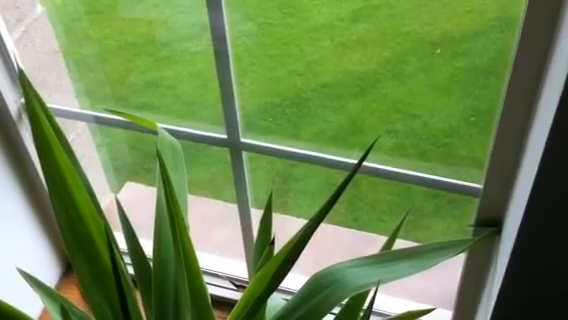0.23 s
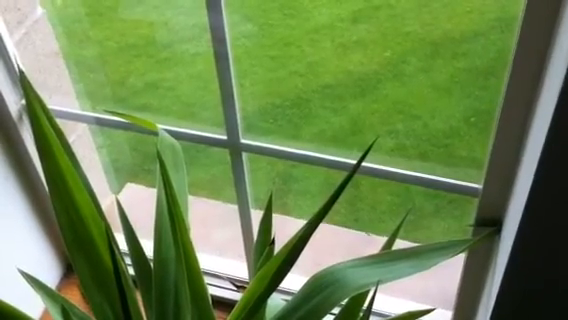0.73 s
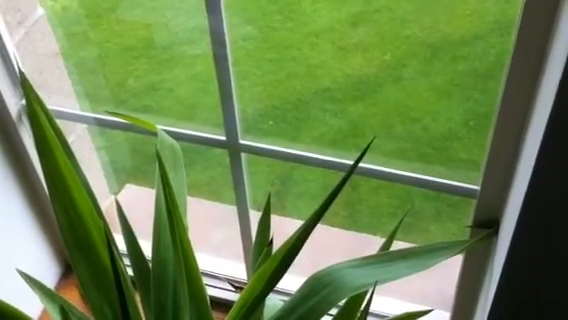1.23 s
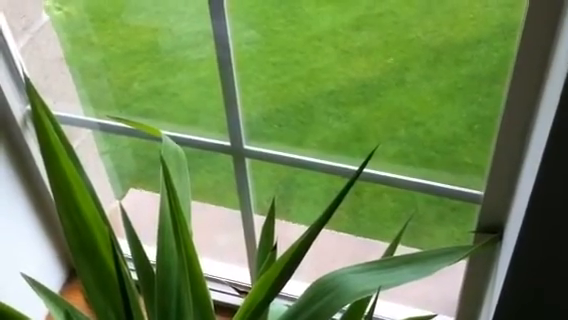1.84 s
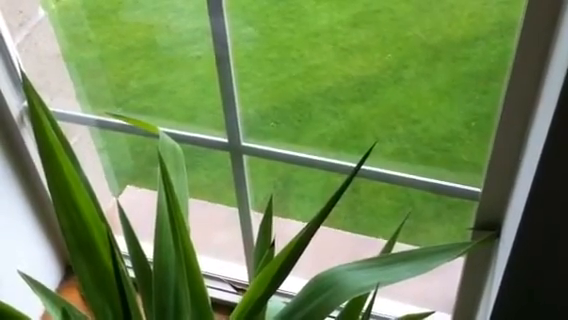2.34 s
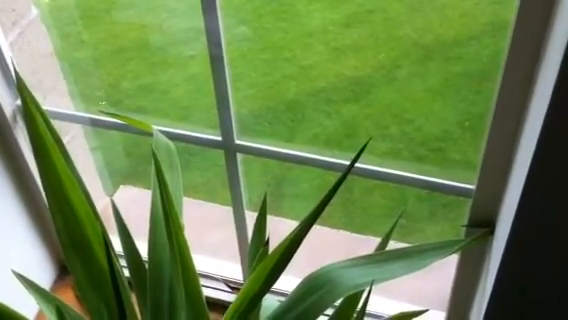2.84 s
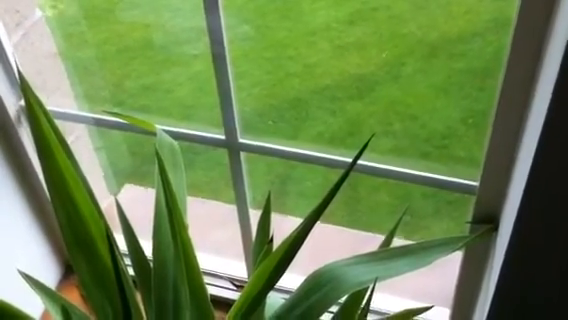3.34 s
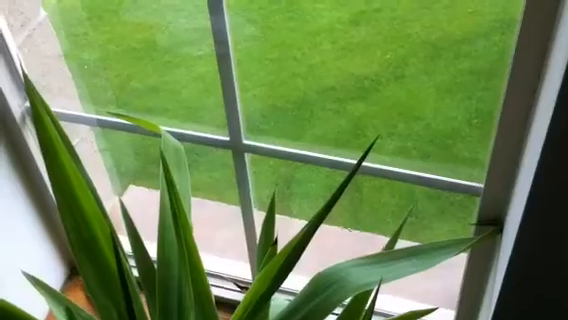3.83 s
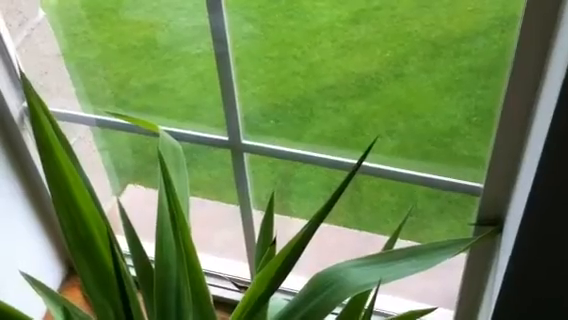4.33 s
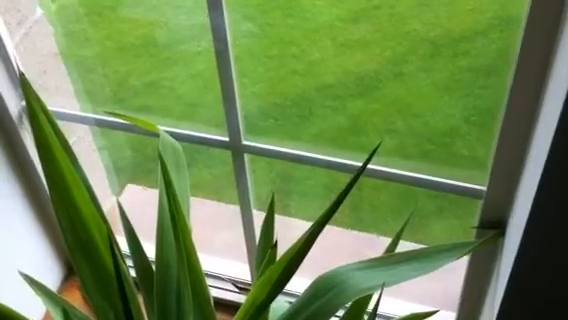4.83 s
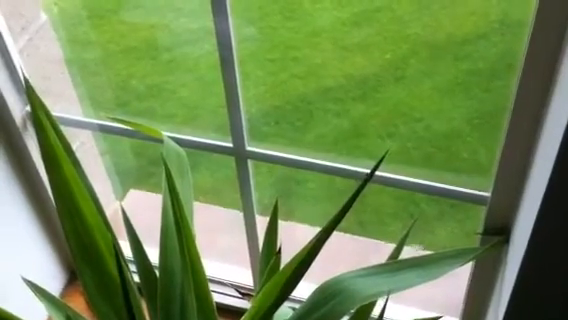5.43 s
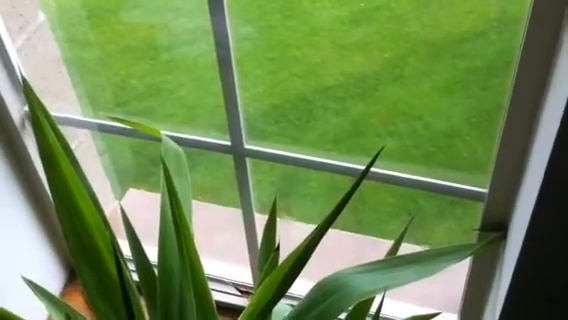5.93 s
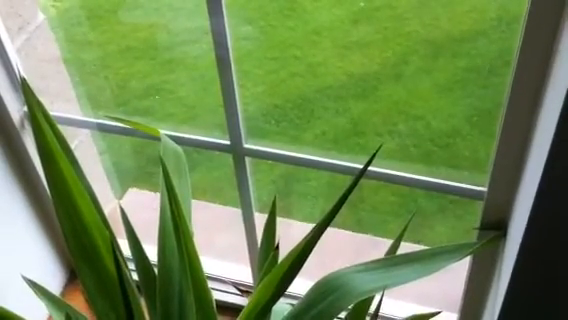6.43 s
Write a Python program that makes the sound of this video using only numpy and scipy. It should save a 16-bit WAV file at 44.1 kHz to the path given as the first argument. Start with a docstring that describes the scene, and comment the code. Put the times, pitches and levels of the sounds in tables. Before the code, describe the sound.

A faint, steady hiss of rain and a dull patter of hail on the roof and walls come through to a microphone just inside a window. Single hailstones tap the glass and frame at uneven intervals, softly at first. A flurry of bright clacks follows midway, then scattered knocks, one hard pair of cracks and some lighter taps. The pane booms slightly and the small room adds a short echo.

```python
"""Hailstones striking a window, heard from one microphone indoors, close beside the pane.
Single stones crack on the glass or knock on frame and wall; the window booms in its low modes
and the small room carries each blow on. Farther off, a dense patter of stones on roof and walls
swells and sinks, and a hiss of rain comes through the wall under it all."""
import sys
import numpy as np
from scipy import signal
from scipy.fft import rfft, irfft
from scipy.io import wavfile
from scipy.ndimage import uniform_filter1d

SR = 44100
rng = np.random.default_rng(int(sys.argv[2]) if len(sys.argv) > 2 else 0)


def dump_mix(stems):
    """Bounce the given channels to the path in sys.argv[1] as a 16-bit WAV at rate SR."""
    frames = np.atleast_2d(stems).T  # one column per channel
    limited = np.clip(frames, -1, 1)  # hard clip at full scale
    pcm = np.round(limited * 32767).astype(np.int16)
    wavfile.write(sys.argv[1], SR, pcm)


N = 295470

# Near stones; where each lands (glass, frame, wall) sets its mix. Columns: t/s, boom level/dB,
# knock level/dB, clack level/dB, crack level/dB, clack f/Hz, clack t60/s, boom f/Hz,
# hardness as tilt above 5 kHz/(dB per octave)
NEAR_STONES = [(0.119, -71, -39.5, -69, -62, 2210, 0.028, 415, 0),
               (0.2936, -68, -59, -60, -58, 2090, 0.062, 417, -8),
               (0.3477, -69, -57, -66, -56, 2350, 0.099, 250, -9),
               (0.7568, -68, -80, -78, -60.5, 2030, 0.066, 256, -12),
               (0.883, -65, -55, -55.5, -66, 1890, 0.12, 253, -5),
               (1.0392, -61.5, -37.5, -80, -59, 1560, 0.021, 433, 0),
               (1.279, -54, -29, -47, -77, 2250, 0.047, 300, 0),
               (1.4797, -60.5, -49.5, -54.5, -65, 2176, 0.21, 327, -6),
               (1.5708, -60.5, -48, -70, -61, 1830, 0.11, 505, -9),
               (1.8254, -69, -47, -70, -74, 2190, 0.033, 254, 0),
               (2.333, -86, -70, -52, -56.5, 1530, 0.041, 272, -10),
               (2.546, -71, -56, -83, -62, 2200, 0.19, 250, -3),
               (2.6455, -76, -52.5, -60, -61, 3000, 0.051, 310, -4),
               (2.688, -62.5, -59, -62.5, -66, 2270, 0.15, 330, 0),
               (2.8405, -80, -38.5, -69, -31, 3180, 0.055, 258, 4.5),
               (3.0216, -86, -41.5, -62, -34.5, 2170, 0.054, 275, 5),
               (3.0934, -81, -57, -51, -44, 2160, 0.08, 358, 2),
               (3.107, -69, -52, -49.5, -54, 2066, 0.12, 328, -9),
               (3.276, -60, -28, -42, -24, 3130, 0.06, 203, -0.6),
               (3.2986, -58.5, -40.5, -62, -33, 1510, 0.057, 194, -1.5),
               (3.348, -59, -31.5, -41, -28.5, 2950, 0.065, 253, 3.5),
               (3.3931, -57, -52, -53, -41.5, 1660, 0.087, 270, 3),
               (3.4544, -54, -40, -40.5, -33.5, 1450, 0.06, 254, 4),
               (3.47, -64, -47, -42.5, -39.5, 2700, 0.055, 254, 4),
               (3.5199, -53.5, -63, -78, -60, 1780, 0.081, 260, 9),
               (3.701, -84, -55, -56, -60, 1830, 0.084, 264, -5),
               (3.8932, -70, -54, -50, -60, 2050, 0.026, 242, 3),
               (4.0148, -66, -61, -77, -67, 2350, 0.3, 440, -7),
               (4.2497, -83, -82, -82, -60, 1630, 0.13, 261, -12),
               (4.4503, -83, -47.5, -51.5, -57, 2050, 0.069, 253, -2),
               (4.6877, -50.5, -36.5, -51, -30.5, 1440, 0.066, 255, 8),
               (4.7728, -68, -65, -57.5, -65, 2580, 0.06, 223, -8),
               (4.8309, -87, -51, -56, -58, 3070, 0.054, 450, 4),
               (4.9524, -66.5, -68, -55.5, -70, 1900, 0.042, 251, 0),
               (5.0741, -52, -33.5, -40, -63, 2186, 0.1, 464, 5),
               (5.1183, -57.5, -45, -82, -66, 2060, 0.24, 306, -2),
               (5.4598, -63.5, -45, -66, -70, 1580, 0.052, 261, -8),
               (5.5154, -38, -14, -24.5, -10, 2720, 0.058, 313, 1),
               (5.5688, -45, -28, -18.5, -25, 2455, 0.039, 324, 1.5),
               (5.6225, -54.5, -51, -60, -41.5, 2440, 0.063, 378, 3),
               (5.8698, -83, -72, -58, -61, 2190, 0.07, 223, -8.5),
               (5.8902, -81, -62, -74.5, -58.5, 2150, 0.043, 318, 0),
               (6.25, -62.5, -37, -41.5, -47.5, 2910, 0.035, 269, -12.5),
               (6.3607, -59, -42.5, -71.5, -55.5, 1920, 0.065, 259, -5.5),
               (6.537, -71, -55, -57.5, -67, 1860, 0.075, 258, 0)]
def near_hail():
    """Stones close to the microphone: the room echoes their noise, the modes die away on their own."""
    track = np.zeros((2, N + SR))
    for start_s, *settings in NEAR_STONES:
        hit = stone(*settings)
        start = int(start_s * SR)
        track[:, start:start + hit.shape[1]] += hit
    noisy, ringing = track[:, :N]
    return room(noisy) + ringing


def stone(boom_db, knock_db, clack_db, crack_db, clack_hz, t60, boom_hz, hardness):
    """One blow at close range: glass cracks, the struck spot clacks, the frame knocks, the window booms."""
    t = np.arange(SR // 2) / SR
    noise = rng.standard_normal((2, len(t)))
    crack = glass_crack(t, t60, hardness)
    clack = unit(band(noise[0], clack_hz / 1.3, clack_hz * 1.3, order=3))
    clack *= fade(t, t60) * rise(t, 0.001045)
    # two close, short modes of the struck spot beat against each other
    ring = np.sin(2 * np.pi * clack_hz * t) + 0.38 * np.sin(2 * np.pi * 1.14 * clack_hz * t)
    ring *= fade(t, 1.3 * t60) * rise(t, 0.00056)
    # the lower knock builds later and stays longer
    knock = unit(band(noise[1], 400, 2640, order=4)) * fade(t, 1.47 * t60) * rise(t, 0.0084)
    boom = window_boom(t, boom_hz)
    # a hard blow also shoves the whole pane inward
    shove = np.sin(2 * np.pi * 70 * t) * fade(t, 0.049) * rise(t, 0.004)
    noisy = undb(crack_db) * crack + undb(clack_db) * clack + undb(knock_db) * knock
    ringing = undb(clack_db + 0.5) * ring + undb(boom_db) * boom + undb(crack_db - 24.5) * shove
    return np.array([noisy, ringing])


# Spectrum of ice on glass, close up. Columns: f/Hz, relative level/dB
CRACK_SPECTRUM = [(3000, -4.5), (4000, -5), (5700, -1.5), (8000, -2.5), (10500, -6.5), (14500, -9),
                  (17000, -30)]
def glass_crack(t, t60, hardness):
    """A sharp contact tick and a tail made ragged by ice splinters and the pane chattering in its seal."""
    chatter = undb(2.7 * unit(uniform_filter1d(rng.standard_normal(len(t)), size=90)))
    noise = coloured(CRACK_SPECTRUM, len(t), centre_hz=5000, slope_db=hardness)
    tail_and_tick = fade(t, 0.91 * t60) + 0.38 * fade(t, 0.006)
    return unit(noise * chatter) * tail_and_tick * rise(t, 0.0012)


# Modes of the window and wall beside the microphone. Columns: f/Hz, relative level/dB, t60/s
WINDOW_MODES = [(143.8, -9, .3), (176.5, -5.5, 0.31), (223, -5.5, 0.31), (257.7, 4, 0.24),
                (321.2, -1.5, 0.3), (379.4, -3, 0.28), (444, -6.5, 0.52), (467.5, -3.5, 0.29),
                (632.5, -9, 0.19), (677, -6.5, 0.31), (844.7, -8, 0.21), (881, -9.5, .25), (1117, -7, 0.34),
                (1197, -8, 0.34)]
def window_boom(t, boom_hz, focus_db=9.5, scatter_db=1.0):
    """The whole window rings; the spot struck favours modes near boom_hz and sets the sign of each."""
    hz, db, t60 = np.transpose(WINDOW_MODES)[:, :, None]
    favour_db = -np.minimum(90 * np.log2(hz / boom_hz) ** 2, focus_db)
    favour_db += scatter_db * rng.standard_normal(hz.shape)
    share = undb(db + favour_db) * rng.choice([-1, 1], hz.shape)
    modes = share * np.sin(2 * np.pi * hz * t) * fade(t, t60)
    return unit(modes.sum(axis=0) * rise(t, 0.0018) ** 2)


# Echo bands of the room around the microphone. Columns: f/Hz, t60/s, relative level/dB
ROOM_BANDS = [(800, 0.3, 2.5), (1960, 0.35, -11.5), (5000, 0.33, -11.5), (11000, 0.47, -23)]
def room(direct, echo_db=3):
    """A small furnished room adds dense echoes, each band with its own decay."""
    t = np.arange(SR // 2) / SR
    echoes = 0
    for hz, t60, db in ROOM_BANDS:
        noise = band(rng.standard_normal(len(t)), hz / 1.83, hz * 1.53)
        decay = fade(t, t60) * rise(t, 0.0015)
        echoes += undb(db) * noise * decay / np.sqrt(np.sum(decay ** 2))
    return direct + undb(echo_db) * signal.fftconvolve(direct, echoes)[:N]


# Level of the distant patter and low window ringing over time; the peak at 3.47 s is the window
# ringing on after a near stone. Columns: t/s, level/dB
PATTER_LEVEL = [(0.0, -58), (0.2, -54.5), (0.55, -61.5), (0.75, -60.5), (1.44, -51), (1.6, -57), (2.2, -54),
                (2.5, -61), (2.85, -54.5), (3.3, -58), (3.47, -51.5), (3.7, -59), (4.35, -55), (4.7, -55.5),
                (5.3, -59.5), (5.999, -57), (6.7, -61)]
def far_patter():
    """Distant stones on roof and walls: dull booms of the window modes, muffled knocks, faint ticks."""
    t = np.arange(SR // 2) / SR
    blows = far_blows()
    hz, db, t60 = np.transpose(WINDOW_MODES)[:, :, None]
    # walls dull the upper modes and damp them all
    dulled = undb(db - 1.6 * np.log2(hz / 250))
    modes = dulled * np.sin(2 * np.pi * hz * t) * fade(t, 0.5 * t60) * rise(t, 0.0031) ** 2
    # each blow finds its own spot on every mode
    booms = sum(signal.fftconvolve(blows * rng.standard_normal(N), mode)[:N] for mode in modes)
    # through walls a blow arrives smeared into a burst of noise
    burst = fade(t, 0.13) * rise(t, 0.0088)
    smear = np.sqrt(signal.fftconvolve(blows ** 2, burst)[:N].clip(0))
    knocks = unit(smear * band(rng.standard_normal(N), 600, 2320))
    hiss = rng.standard_normal(N)
    ticks = unit(smear * (band(hiss, 5180, 6400) + undb(-4) * band(hiss, 7600, 9000)))
    level_db = np.interp(np.arange(N) / SR, *np.transpose(PATTER_LEVEL))
    return (unit(booms) + undb(-7.5) * knocks + undb(-16) * ticks) * undb(level_db)


def far_blows(per_s=220, spread_db=14):
    """Stones land on the house at random: clicks of uneven size and either sign."""
    when, size, sign = rng.random((per_s * N // SR, 3)).T
    clicks = np.zeros(N)
    clicks[(when * N).astype(int)] = undb(spread_db * size ** 2) * np.sign(sign - 0.5)
    return clicks


# Spectrum of the rain outside, from indoors. Columns: f/Hz, relative level/dB
RAIN_SPECTRUM = [(18, -44), (30, -33.5), (48, -39.5), (65, -29), (142, -5.5), (261, -2), (577, -7.5),
                 (2160, -21.5), (3380, -30), (5740, -27.5), (10500, -35.5), (14800, -33), (16500, -38.5)]
def rain(level_db=-56):
    """Background rain through the wall: octave bands of hiss that swell together and flicker alone."""
    swell_db = 0.5 * wander(1.4)
    hiss = 0
    for octave in range(10):
        part = coloured(RAIN_SPECTRUM, N, centre_hz=30 * 2 ** octave, bend_db=12)
        hiss += part * undb(swell_db + 0.8 * wander(9))
    return unit(hiss) * undb(level_db)


def undb(db):
    return 10 ** (np.asarray(db) / 20)


def rise(t, tau_s):
    return 1 - np.exp(-t / tau_s)


def fade(t, t60):
    """Falls 60 dB in t60 seconds."""
    return np.exp(-np.log(1000) * t / t60)


def unit(x):
    return x / np.sqrt(np.mean(x ** 2))


def band(x, lo_hz, hi_hz, order=2):
    sos = signal.butter(order, [lo_hz, min(hi_hz, SR / 2.2)], "bandpass", fs=SR, output="sos")
    return signal.sosfilt(sos, x)


def coloured(spectrum, size, centre_hz, slope_db=0, bend_db=0):
    """Noise of a given spectrum, tilted above a centre (dB/octave) or bent down around it (dB/octave^2)."""
    hz, db = np.transpose(spectrum)
    octave = np.log2(np.arange(size // 2 + 1) * SR / size + 1)
    offset = octave - np.log2(centre_hz)
    gain_db = np.interp(octave, np.log2(hz), db, left=-70)
    gain_db += slope_db * offset.clip(0) - bend_db * offset ** 2
    return irfft(rfft(rng.standard_normal(size)) * undb(gain_db), size)


def wander(per_s):
    """Random steps, smoothed twice; RMS 1."""
    hold = int(SR / per_s)
    steps = np.repeat(rng.standard_normal(N // hold + 1), hold)
    return unit(uniform_filter1d(uniform_filter1d(steps, hold), hold)[:N])


def scene():
    """At the window, in mono: hail up close, patter farther off, rain behind."""
    return (near_hail() + far_patter() + rain())[None]


def record(dry):
    """The recorder cuts the microphone's treble above 16.5 kHz."""
    return signal.sosfilt(signal.ellip(8, 0.2, 70, 16500, fs=SR, output="sos"), dry)


dry = scene()
out = record(dry)
dump_mix(out)
```